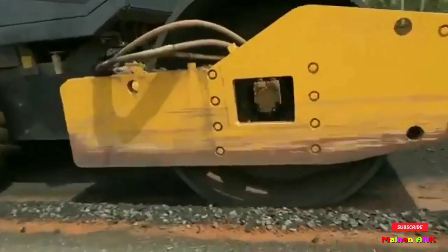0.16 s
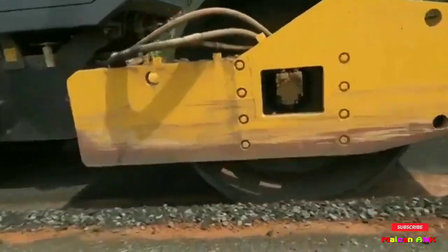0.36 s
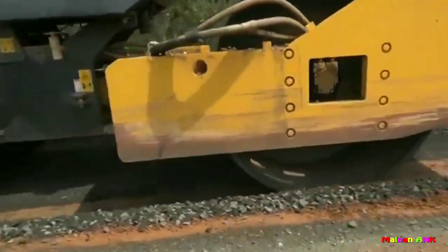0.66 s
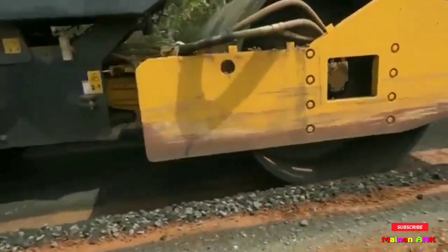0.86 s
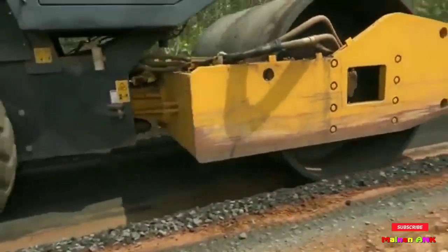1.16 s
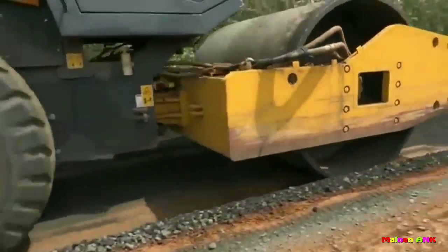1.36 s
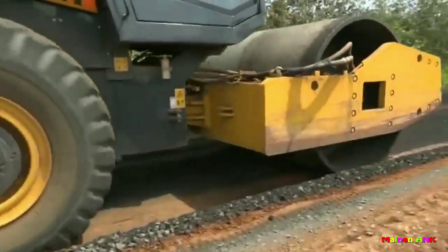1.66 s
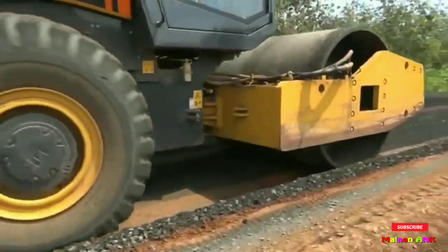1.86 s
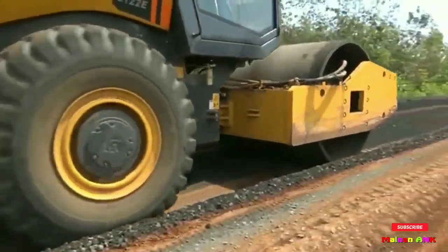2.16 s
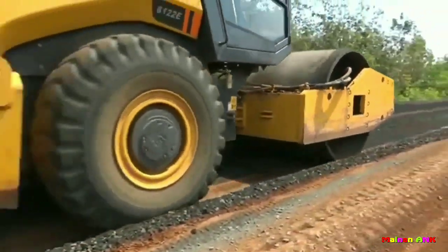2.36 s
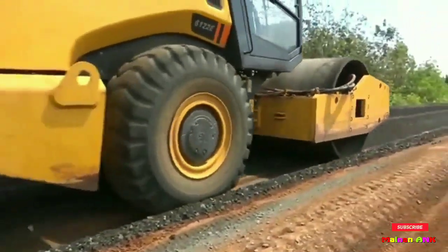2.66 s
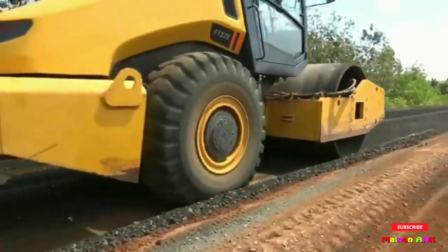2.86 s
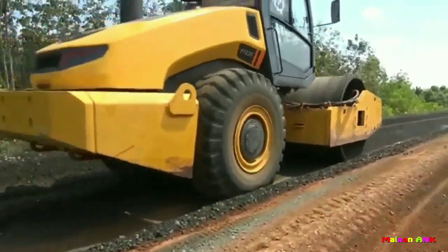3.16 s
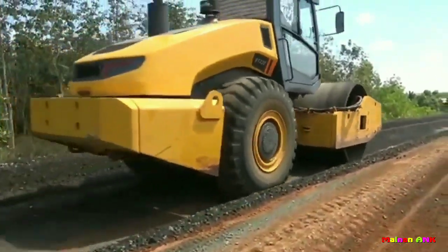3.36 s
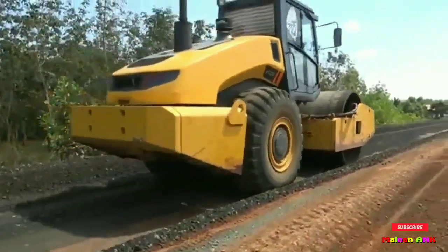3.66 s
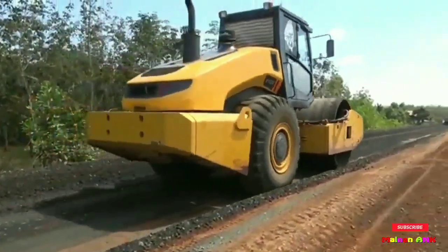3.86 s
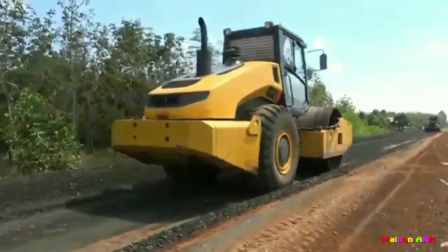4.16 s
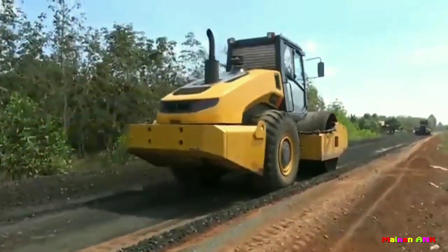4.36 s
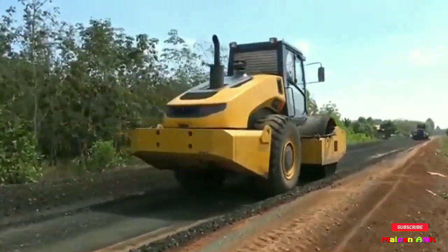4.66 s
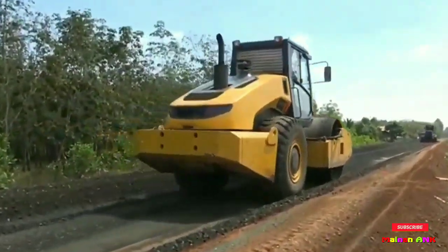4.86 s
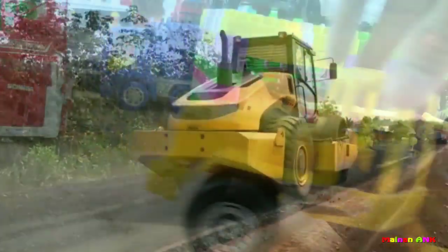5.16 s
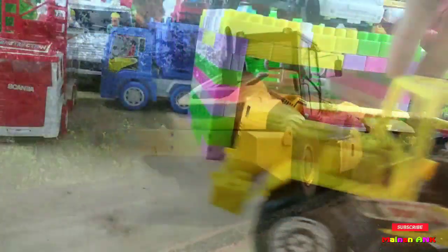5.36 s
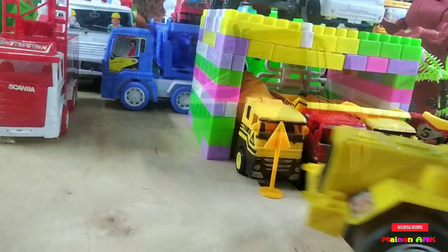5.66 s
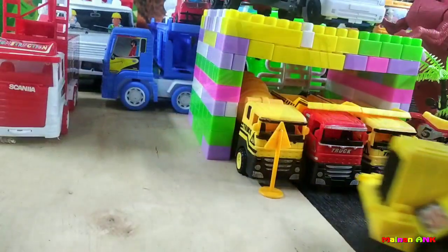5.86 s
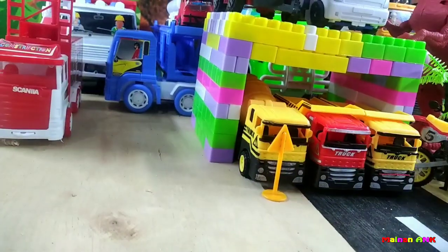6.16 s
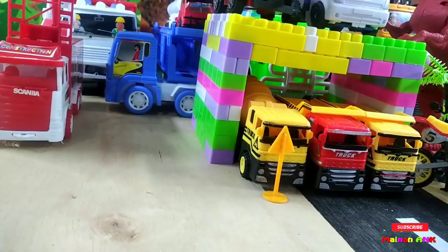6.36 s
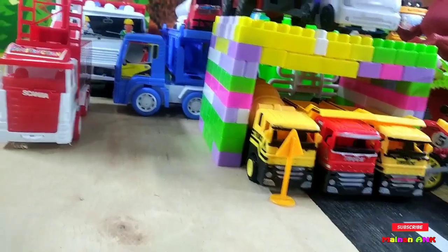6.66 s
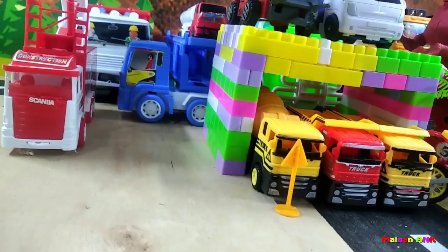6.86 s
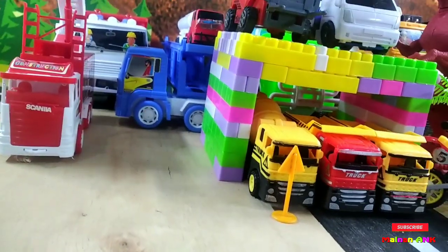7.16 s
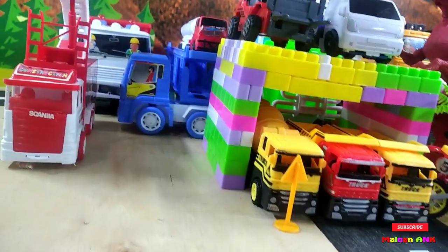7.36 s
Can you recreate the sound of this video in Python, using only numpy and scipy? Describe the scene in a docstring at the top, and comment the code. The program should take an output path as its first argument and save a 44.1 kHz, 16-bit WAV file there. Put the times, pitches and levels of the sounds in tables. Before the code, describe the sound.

Continuous gritty gravel roar leads, centred and fairly narrow in tone, with a hydraulic whine swelling and dropping and a dull diesel drone receding behind it. It crossfades indoors near the end, where a toy vehicle bumps and drags over a hard board: irregular hollow knocks, plastic clicks, muffled thumps left, brief rubbing strokes, low rumble and thin room hiss, close and dry in stereo.

```python
"""Stones hiss and rattle under the drum of a road roller, a hydraulic pump whines and the engine drones, in mono.
It fades into a quiet room: plastic toys roll, knock and scrape on a board, over a low left rumble and two whistles.
Stones, engine and clatter are noise shaped by spectra and panel resonances; the pump and the firing are sine series.
Knocks are decaying modes, thuds are three damped partials, scrapes and room sound are filtered noise."""
import sys
import numpy as np
from scipy import signal
from scipy.fft import rfft, irfft, next_fast_len
from scipy.io import wavfile
from scipy.ndimage import uniform_filter1d, map_coordinates

SR = 44100
rng = np.random.default_rng(int(sys.argv[2]) if len(sys.argv) > 2 else 0)


def unload_wav(signal):
    """Save mono or channel-first audio to the path in sys.argv[1] as 16-bit WAV at rate SR, clipped to [-1, 1]."""
    wavfile.write(
        sys.argv[1],
        SR,
        np.round(np.clip(np.atleast_2d(signal).T, -1, 1) * 32767).astype(np.int16),
    )


N = 330750

TURN_S = 0.8, 3.4  # the machine passes and turns its back between these times
RECEDE_S = 2.65, 5.74  # engine drone, clatter and low stones sink as it draws away
FADE_OUT_S = 5.08, 6.29  # the roller's gain falls on a straight line from full to nothing
CUT_S = 6.13  # the roller's remainder is cut off over 30 ms, and the toys start to roll
FADE_IN_S = 4.98, 6.16  # the room's gain rises on a straight line
LEFT_LAG = 17  # samples by which the left channel trails; the toys are nearer the right port
FIRING_HZ = 51.4, 50.8  # (alongside, once gone by)
MACHINE_DB = -31  # reference level of engine, clatter, pump and firing tones


def roller():
    """Superposition: stones, machine and whine add up to one mono source that fades and is cut off."""
    firing_hz = passing(*FIRING_HZ) + 0.15 * wobble(4)
    pump_hz = pump_rate()
    machine = engine() + clatter() + pump(pump_hz) + firing(firing_hz)
    total = stones(firing_hz) + amp(MACHINE_DB) * machine + whine(pump_hz)
    start, end = FADE_OUT_S
    return total * fade(end, start) * fade(CUT_S + 0.03, CUT_S)


# Spectrum of the crushed gravel. Each row: frequency in Hz, gain in dB.
GRAVEL_SPECTRUM = [(40, -46.5), (250, -41), (1120, -45), (1900, -13), (2210, -5.5), (2430, -1),
                   (2560, -2.5), (2840, -2), (3450, -6.5), (3970, -6), (5540, -20), (5950, -30.5),
                   (6270, -49), (6550, -31), (6960, -30), (8370, -29.5), (9140, -23), (11800, -36.5),
                   (15500, -48)]
# Stones under the drum. Each row: time in seconds, level in dB, gain of the upper roar in dB.
CRUSH_LEVELS = [(0, -32.5, 1.5), (.22, -33, 1.5), (.45, -31, -0.5), (.76, -31.5, 1), (1.05, -31.5, 0.5),
                (1.3, -32, 1), (1.7, -31.5, 1.5), (2.0, -31.5, -0.5), (2.4, -30, -0.5), (2.7, -31.5, 1),
                (2.95, -31, -0.5), (3.2, -30.5, -0.5), (3.6, -30, -1), (3.85, -30, 0), (4.13, -31, -1),
                (4.32, -30, -1.5), (4.55, -29.5, -2), (4.7, -30.5, -2), (5.0, -32, -1.5), (5.4, -32.5, -.5),
                (5.75, -33.5, 0), (6.2, -33.5, 3)]
DIESEL_KNOCK_DB, KNOCK_JITTER = -14.5, 0.02  # jitter scales a random curve, in tick periods
LOW_STONES_DB, LOW_STONES_HZ = (1.1, -4), (1800, 2354)  # roar just under the whine thins as it draws away
UPPER_ROAR_HZ = 3150, 4500
TOP_FADES_HZ, TOP_FADES_S = 12500, (5.15, 5.65)  # the highest hiss is gone before the rest


def stones(firing_hz):
    """Source and filter: crushing noise, grit and combustion ticks excite the panel resonances."""
    crunch = patchy(depth_db=0.5) + 0.5 * grit(rate=1000, spread_db=-0.5)
    crunch = crunch * amp(0.14 * wobble(40) + 0.87 * wobble(80))
    crunch = crunch + amp(DIESEL_KNOCK_DB) * ticks(2 * firing_hz, KNOCK_JITTER)
    gravel = unit(filtered(crunch, lambda hz: amp(along(GRAVEL_SPECTRUM, hz)) * bodywork(hz)))
    level_db, upper_db = curves(CRUSH_LEVELS)
    gravel = band_gain(gravel, *LOW_STONES_HZ, passing(*LOW_STONES_DB, RECEDE_S))
    gravel = gravel - fade(*TOP_FADES_S) * filtered(gravel, lambda hz: hz > TOP_FADES_HZ)
    gravel = band_gain(gravel, *UPPER_ROAR_HZ, upper_db)
    return amp(level_db + 0.31 * wobble(11)) * gravel


def band_gain(x, low, high, gain_db):
    """Equalization: one frequency band of x receives a gain that varies in time."""
    return x + (amp(gain_db) - 1) * filtered(x, lambda hz: (hz > low) & (hz < high))


# Spectrum of the engine drone. Each row: frequency in Hz, gain in dB.
ENGINE_SPECTRUM = [(21, -88), (35, -70), (65, -56), (97, -35), (117, -29), (145, -55), (246, -24.5),
                   (326, -19.5), (359, -13.5), (475, -14.5), (517, -3), (704, -4), (822, -3.5), (919, -14),
                   (1000, -14), (1300, -23), (2200, -120)]
ENGINE_DB = -19.5, -24.5  # dB over the machine level (alongside, drawn away)


def engine():
    """Broadband excitation: shaped noise drones through the panels and sinks with distance."""
    drone = filtered(patchy(depth_db=1.15), lambda hz: amp(along(ENGINE_SPECTRUM, hz)) * bodywork(hz))
    return amp(passing(*ENGINE_DB, RECEDE_S)) * unit(drone)


# Spectrum of the clatter. Each row: frequency in Hz, gain in dB.
CLATTER_SPECTRUM = [(40, -58), (560, -40), (950, -30), (999, -9.5), (1420, 2.5), (1910, -0.5), (2000, -17),
                    (2600, -20), (4400, -120)]
CLATTER_DB = -12, -17.5  # dB over the machine level (alongside, drawn away)
GROUND_ECHO_S, GROUND_ECHO = 0.00719, 0.21  # delay and gain of the reflection off the road


def clatter():
    """Comb filtering: shaped noise interferes with its own reflection off the road."""
    def response(hz):
        echo = GROUND_ECHO * np.exp(-2j * np.pi * hz * GROUND_ECHO_S)
        return amp(along(CLATTER_SPECTRUM, hz)) * bodywork(hz) * (1 + echo)
    return amp(passing(*CLATTER_DB, RECEDE_S)) * unit(filtered(patchy(depth_db=0.4), response))


# Bodywork panels. Each row: frequency in Hz, width in Hz, gain in dB.
PANEL_MODES = [(360, 13, 5.5), (426, 14.4, 9), (516, 14, -4), (712, 29, 6), (1036, 7.3, 7.5),
               (1530, 36, 2.5), (2760, 59, 1.5), (3880, 14, 6.5), (7000, 130, 4.5), (9400, 110, -2.5),
               (11300, 200, 3), (11900, 200, 7)]


def bodywork(hz):
    """Resonance: each panel adds a bell-shaped boost or dip in dB around its own frequency."""
    return amp(sum(db / (1 + (2 * (hz - c) / w) ** 2) for c, w, db in PANEL_MODES))


# Rotation rate of the pump. Each row: time in seconds, frequency in Hz.
PUMP_RATE = [(0, 402.3), (.7, 401.2), (1.2, 400.4), (1.7, 399.8), (2.05, 401.6), (2.9, 400.5), (3.6, 400.2),
             (4.3, 401.1), (4.9, 399.7), (6.2, 399.9)]


def pump_rate():
    """Frequency modulation: the pump's rate drifts along a curve with a small random waver."""
    return curves(PUMP_RATE)[0] + 0.24 * wobble(9)


# Pump tones. Each row: multiple of the rate, dB over the machine level alongside, and once gone by, before load.
PUMP_TONES = [(1.5, -39, -31), (2, -23, -50), (3, -42, -30), (4.5, -49, -32), (7, -12.5, -28.5),
              (8, -19, -32), (9, -19, -27), (10, -12.5, -39)]
# Load on the pump. Each row: time in seconds, gain of its tones in dB.
PUMP_LOAD_GAIN = [(0, -9), (.15, -6), (.3, 2.5), (1.05, 3.5), (1.35, -3), (1.5, -2), (2.5, -1), (3.5, -2),
                  (6.2, 1)]


def pump(pump_hz):
    """Additive synthesis: the pump sings at multiples, some fractional, of its rate, louder or softer with load."""
    return amp(curves(PUMP_LOAD_GAIN)[0]) * overtones(PUMP_TONES, pump_hz, waver_db=1.6)


# Firing tones. Each row: multiple of the firing rate, dB over the machine level alongside, and once gone by.
FIRING_TONES = [(1.97, -54, -44.5), (2.3, -54, -52), (3.9, -50, -57), (4.87, -56, -46.5), (6.98, -43, -36),
                (7.16, -35.5, -55), (8.14, -33.5, -45), (10, -45, -50), (14, -28, -36), (19.1, -38, -54),
                (20.23, -33, -35)]


def firing(firing_hz):
    """Periodic excitation: the engine hums at multiples, some fractional, of its firing rate."""
    return overtones(FIRING_TONES, firing_hz, waver_db=2.5)


# Pump whine at six times the rate, which comes and goes. Each row: time in seconds, level in dB.
WHINE_LEVELS = [(0.0, -43), (.22, -36), (0.5, -34), (0.76, -42), (0.93, -51), (1.05, -33.5), (1.45, -59),
                (1.62, -43), (1.72, -37), (2.22, -36.5), (2.52, -37), (2.66, -40.5), (2.93, -30),
                (3.1, -42), (3.4, -40), (3.5, -33), (3.7, -33), (3.92, -51), (4.03, -37), (4.49, -36.5),
                (4.68, -49), (4.94, -35), (5.3, -34.5), (5.55, -39), (6.1, -43)]


def whine(pump_hz):
    """Amplitude modulation: a sine at six times the pump's rate swells and fades."""
    level = amp(curves(WHINE_LEVELS)[0] + 1.2 * wobble(22))
    return level * np.sin(6 * 2 * np.pi * np.cumsum(pump_hz) / SR)


# Bumps of the toys. Each row: start in seconds, blow level in dB, click in dB relative to it,
# left minus right of the board tone in dB; knocks() adds fixed trims.
TOY_KNOCKS = [(5.53, -49, -15, -2), (5.552, -47, -15, -1), (6.084, -52, -11, -12), (6.152, -39, -10, -4),
              (6.176, -44, 6, -1.0), (6.263, -36, 17.5, 1), (6.364, -41, -11, 0), (6.392, -41, -2, 1),
              (6.43, -40.5, -9, 3), (6.508, -47, -10, 4), (6.563, -36.5, -16, -4), (6.645, -45, -12, 1),
              (6.729, -39.5, -6, 4), (6.86, -41.5, -15, -3), (6.948, -38.5, -14, 2),
              (7.034, -43.5, -12, -9), (7.083, -46, -10, -3), (7.174, -45, -7, -8), (7.192, -43, -12, 1),
              (7.25, -47, -14, -9), (7.261, -43, -3, 1), (7.275, -43, -6, 1), (7.41, -44.5, 0, -3)]
# Modes of the board. Each row: frequency in Hz, level in dB, t60 in seconds.
BOARD_MODES = [(370, 1.5, 0.062), (534.5, 5.5, 0.099), (625, 5, 0.063), (708, 3.5, 0.077), (878, 8, 0.075),
               (1026, 0, 0.06), (1490, -1, 0.043), (2040, 0, 0.027)]
# Modes of the plastic shell. Each row: frequency in Hz, level in dB, t60 in seconds.
SHELL_MODES = [(2016, -14, 0.0096), (3700, -6, 0.004), (3916, 1, 0.007), (4200, -12, .007),
               (7400, -8.5, 0.0099), (8920, 5, 0.0057), (9830, -3.5, 0.0076), (11600, -5, .007),
               (14050, -14, .006)]


def knocks():
    """Modal response: each bump of a toy rings the board and snaps its shell, which bounces once."""
    out, t = np.zeros((2, N + SR)), np.arange(SR // 4) / SR
    for s, db, click_db, pan_db in TOY_KNOCKS:
        chatter = 1 + 2.2 * uniform_filter1d(rng.standard_normal(len(t)), size=40)
        board = ringing(BOARD_MODES, t, attack=0.0016) * chatter
        snap = np.roll(ringing(SHELL_MODES, t, attack=0.0005), 14)
        bounce = np.roll(ringing(SHELL_MODES, t, attack=0.0004), 135)
        snap = snap + 0.27 * bounce
        for side, (lag, sign) in enumerate([(LEFT_LAG, 1), (0, -1)]):
            board_gain = amp(-4.5 + sign * pan_db / 2)
            snap_gain = amp(click_db + 5.0 + sign * 4.4)
            blow = board_gain * board + snap_gain * snap
            out[side, round(s * SR) + lag:][:len(t)] += amp(db) * blow
    return out[:, :N]


def ringing(modes, t, attack):
    """Free vibration: modes decay, each blow giving them new strengths and slightly new pitches."""
    ring = 0
    for hz, db, t60 in modes:
        decay = amp(db + rng.normal(0, 2.0) - 60 * t / t60)
        ring = ring + decay * np.sin(2 * np.pi * hz * rng.normal(1, 0.028) * t)
    return ring * (1 - np.exp(-t / attack))


# Soft bumps through the board. Each row: start in seconds, pitch in Hz, level in dB before attack and pan.
SOFT_THUDS = [(5.516, 186, -43.5), (5.546, 85, -48), (5.61, 110, -46), (5.7, 125, -42), (5.79, 205, -44),
              (5.941, 180, -40), (6.073, 240, -45), (6.085, 90, -43), (6.115, 105, -42), (6.138, 188, -48),
              (6.209, 171, -37), (6.262, 257, -33), (6.275, 338, -36), (6.305, 238, -36), (6.364, 225, -37),
              (6.406, 131, -36), (6.501, 121, -38), (6.575, 130, -42), (6.61, 130, -39), (6.674, 121, -34),
              (6.735, 246, -39), (6.772, 151, -36), (6.83, 120, -46), (6.901, 179, -35), (6.945, 190, -36),
              (7.027, 170, -39), (7.065, 150, -42), (7.15, 191, -43), (7.25, 300, -34.5), (7.311, 128, -47),
              (7.356, 179, -36), (7.42, 150, -37), (7.485, 120, -36)]
THUD_ATTACK_S, THUD_T60_S, THUD_PAN_DB = 0.0061, 0.081, 15.5  # pan is left minus right


def thuds():
    """Damped oscillation: soft low bumps with a deeper and a higher partial, mostly on the left."""
    out, t = np.zeros(N + SR), np.arange(SR // 4) / SR
    for s, hz, db in SOFT_THUDS:
        deep_phase, high_phase = rng.uniform(0, 2 * np.pi, size=2)
        body = np.sin(2 * np.pi * hz * t)
        body = body + 0.34 * np.sin(2 * np.pi * 0.566 * hz * t + deep_phase)
        body = body + 0.39 * np.sin(2 * np.pi * 1.6 * hz * t + high_phase)
        envelope = amp(db - 60 * t / THUD_T60_S) * (1 - np.exp(-t / THUD_ATTACK_S))
        out[round(s * SR):][:len(t)] += envelope * body
    pair = np.array([np.roll(out[:N], LEFT_LAG), out[:N]])
    return pair * amp([[THUD_PAN_DB / 2], [-THUD_PAN_DB / 2]])


# Spectrum of plastic dragged on the board. Each row: frequency in Hz, gain in dB.
DRAG_SPECTRUM = [(180, -40), (300, -3), (402, -10), (520, -4), (592, -11), (917, -5.5), (1290, -9.5),
                 (1960, -3.5), (2590, -10), (3820, -4), (5110, -17), (7500, -11), (9610, -7.5),
                 (11500, -18.5), (14400, -22)]
# Strokes of the drag. Each row: start in seconds, hold in seconds, level in dB, t60 in seconds.
DRAG_STROKES = [(6.134, 0.078, -39, 0.17), (6.238, 0.026, -38, 0.8), (6.496, 0.032, -43.5, 0.12),
                (6.555, .01, -42, 0.35), (6.707, 0.013, -47, .15), (6.837, .02, -46, 0.22),
                (7.02, 0.016, -45.5, 0.47), (7.158, .025, -44.5, 0.93), (7.255, 0.0086, -37, 0.11)]
STROKE_ATTACK_S = 0.0098


def scrape():
    """Friction: gritty noise under each stroke of plastic on the board rises, holds and dies away."""
    rub = rng.standard_normal((3, N)) * amp(1.1 * wobble(60)) + 0.33 * grit(rate=1500, spread_db=3.0)
    rub = filtered(rub, lambda hz: amp(along(DRAG_SPECTRUM, hz)))
    t = np.arange(N) / SR
    strokes = []
    for s, hold, db, t60 in DRAG_STROKES:
        since_hold = np.maximum(t - s - STROKE_ATTACK_S - hold, 0)
        strokes.append(fade(s, s + STROKE_ATTACK_S) * amp(db - 60 * since_hold / t60))
    return np.max(strokes, axis=0) * ports(unit(rub[0]), unit(rub[1:]), share=0.91, pan_db=3.5)


# Faint whistles. Each row: start in seconds, length in seconds, first pitch in Hz, last pitch in Hz,
# level in dB before waver and pan, sink over the length in dB.
WHISTLE_TONES = [(6.508, 0.2, 2700, 2700, -52, 8), (7.35, .13, 2580, 2590, -49.5, 12)]


def whistles():
    """Frequency modulation: faint, unsteady tones waver in pitch and sink away, stronger on the right."""
    out, waver_hz = np.zeros(N), 14 * wobble(45)
    for s, length, from_hz, to_hz, db, sink_db in WHISTLE_TONES:
        start = round(s * SR)
        u = np.arange(round(length * SR)) / (length * SR)
        hz = from_hz + (to_hz - from_hz) * u + waver_hz[start:][:len(u)]
        envelope = amp(db - sink_db * u) * np.abs(np.sin(np.pi * u)) ** 0.26
        out[start:][:len(u)] += envelope * np.sin(2 * np.pi * np.cumsum(hz) / SR)
    return out * amp(2.7 * wobble(33)) * amp([[-2.5], [2.5]])


# Spectrum of the low rumble. Each row: frequency in Hz, gain in dB.
RUMBLE_SPECTRUM = [(25, -50), (45, -29), (58, -6), (71, 8), (92, -4.5), (120, 4.5), (150, -2), (190, 3),
                   (260, -4), (310, -6), (360, -2.5), (420, -17), (600, -37)]
# Spectrum of the room air. Each row: frequency in Hz, gain in dB.
AIR_SPECTRUM = [(180, -22), (300, -9), (364, -27), (422, -2), (504, 0.5), (1040, -2), (1700, -10.5),
                (1960, -6), (2900, -9.5), (4490, -3.5), (5360, -23), (6730, -14.5), (8720, -10.5),
                (12900, -30), (14400, -13)]
# Spectrum of the thin hiss. Each row: frequency in Hz, gain in dB.
HISS_SPECTRUM = [(4500, -40), (6000, -1), (9000, 3), (10800, -2), (12200, -3), (12800, -12), (14400, -23)]
RUMBLE_DB, AIR_DB, HISS_DB = (-53.5, -49), (-47, -44.5), -54.5  # pairs: before the toys roll, while they roll
RUMBLE_IN_S, AIR_IN_S = 0.13, 0.019  # how long before the cut each starts to swell
AIR_PATCHY_DB, AIR_WAVER_DB = 2.5, 0.7
PATTER_PER_S, PATTER_DB = 200, -9  # small bumps of rolling wheels within the rumble


def room():
    """Partial coherence: left-heavy rumble largely common, room air partly common, hiss separate per channel."""
    rumble = rng.standard_normal((3, N)) * amp(0.77 * wobble(6) + 1.5 * wobble(25))
    rumble = rumble + amp(PATTER_DB) * grit(PATTER_PER_S, spread_db=1.5)
    rumble = filtered(rumble, lambda hz: amp(along(RUMBLE_SPECTRUM, hz)))
    rumble = ports(unit(rumble[0]), unit(rumble[1:]), share=0.13, pan_db=14.5)
    rumble = amp(passing(*RUMBLE_DB, (CUT_S - RUMBLE_IN_S, CUT_S))) * rumble
    air = np.array([patchy(AIR_PATCHY_DB) for _ in range(3)])
    air = filtered(air, lambda hz: amp(along(AIR_SPECTRUM, hz)))
    air = ports(unit(air[0]), unit(air[1:]), share=0.73, pan_db=1.0)
    air_db = passing(*AIR_DB, (CUT_S - AIR_IN_S, CUT_S))
    air = amp(air_db + AIR_WAVER_DB * wobble(8.0)) * air
    hiss = unit(filtered(rng.standard_normal((2, N)), lambda hz: amp(along(HISS_SPECTRUM, hz))))
    hiss = amp(HISS_DB) * amp([[1.5], [-1.5]]) * hiss
    return (rumble + air + hiss) * fade(*FADE_IN_S)


def ports(common, separate, share, pan_db):
    """Partial coherence: a common sound (left late) plus a power share that differs between channels."""
    pair = np.array([np.roll(common, LEFT_LAG), common]) * np.sqrt(1 - share) + separate * np.sqrt(share)
    return pair * amp([[pan_db / 2], [-pan_db / 2]])


def overtones(orders, hz, waver_db):
    """Additive synthesis: multiples of a rate, whose balance shifts as the machine passes and turns."""
    turn = 2 * np.pi * np.cumsum(hz) / SR
    total = 0
    for multiple, near_db, far_db in orders:
        gain = amp(passing(near_db, far_db) + waver_db * wobble(7))
        total = total + gain * np.sin(multiple * turn + rng.uniform(0, 2 * np.pi))
    return total


def passing(near, far, span=TURN_S):
    """Linear interpolation: a value moves from near to far over a time span."""
    return near + (far - near) * fade(*span)


def ticks(hz, jitter):
    """Pulse train: one short pulse per period, slightly uneven in time and size."""
    phase = np.cumsum(hz) / SR + jitter * wobble(60)
    pulses = np.diff(np.maximum.accumulate(np.floor(phase)), prepend=0)
    return unit(pulses * amp(1.9 * rng.standard_normal(N)))


def patchy(depth_db):
    """Nonstationary noise: white noise with patches of random gain in time and frequency."""
    z = signal.stft(rng.standard_normal(N), nperseg=512)[2]
    field = uniform_filter1d(rng.standard_normal(z.shape), size=7, axis=0)
    field = uniform_filter1d(field, size=8, axis=1)
    return unit(signal.istft(z * amp(depth_db * unit(field)), nperseg=512)[1][:N])


def grit(rate, spread_db):
    """Random impacts: sparse one-sample clicks, rate per second, of uneven size and sign."""
    hit, size, sign = rng.random((3, N))
    return unit((hit < rate / SR) * amp(-spread_db * np.log(size + 0.05)) * (sign - 0.5))


def wobble(rate):
    """Slow modulation: a smooth random curve with rate knots a second."""
    knots = rng.standard_normal(int(N * rate / SR) + 4)
    return map_coordinates(knots, [np.arange(N) * rate / SR])


def filtered(x, response):
    """Linear filtering: the spectrum of x is multiplied by a response of frequency."""
    m = next_fast_len(N + 8192)
    return irfft(rfft(x, m) * response(np.fft.rfftfreq(m, 1 / SR)), m)[..., :N]


def along(points, hz):
    """Logarithmic frequency scale: (Hz, value) points are joined on a log axis."""
    f, v = np.transpose(points)
    return np.interp(np.log(hz + 1), np.log(f + 1), v)


def curves(rows):
    """Linear interpolation: one value per sample for each column after the time."""
    s, *cols = np.transpose(rows)
    return [np.interp(np.arange(N) / SR, s, c) for c in cols]


def fade(start, end):
    """Linear ramp: gain 0 at start and 1 at end; with end before start it falls."""
    return np.clip((np.arange(N) / SR - start) / (end - start), 0, 1)


def amp(db):
    """Decibel scale: level in dB to amplitude ratio."""
    return 10 ** (np.asarray(db) / 20)


def unit(x):
    """Normalization: x scaled to an effective (RMS) value of one."""
    return x / np.sqrt(np.mean(x ** 2) + 1e-20)


def scene():
    """Superposition: the mono roller plus the stereo room, which is band-limited at 14350 Hz."""
    indoors = knocks() + thuds() + scrape() + whistles() + room()
    return roller() + filtered(indoors, lambda hz: hz < 14350)


def record(dry):
    """Band limitation: nothing is kept from 15600 Hz upward."""
    return filtered(dry, lambda hz: hz < 15600)


dry = scene()
out = record(dry)
unload_wav(out)
```